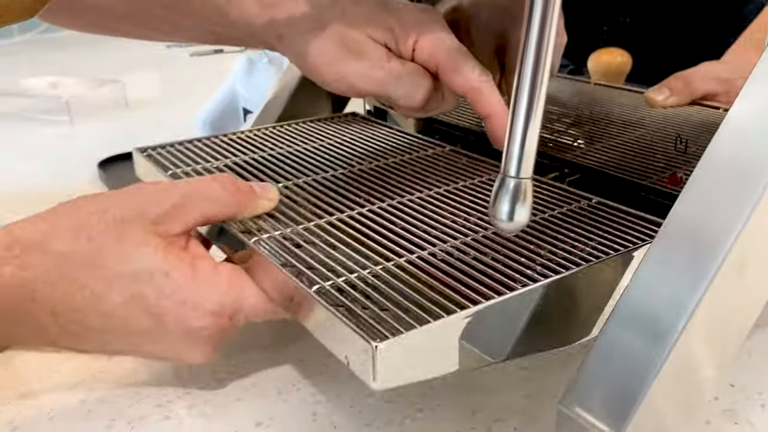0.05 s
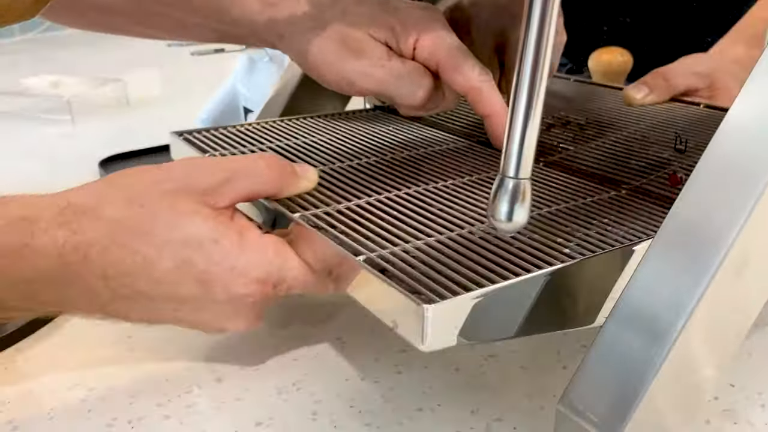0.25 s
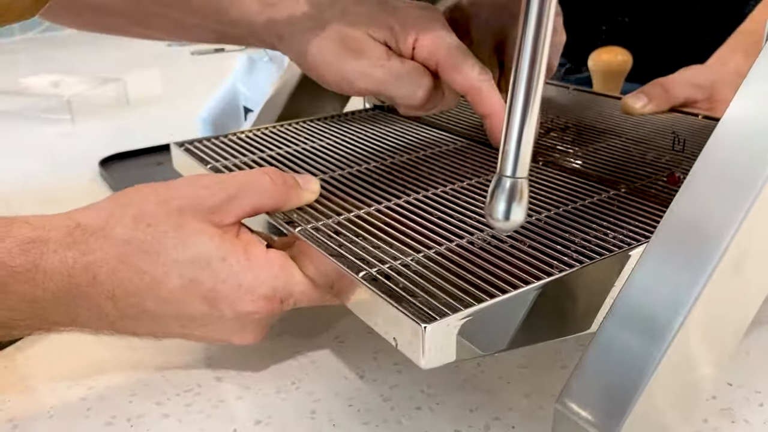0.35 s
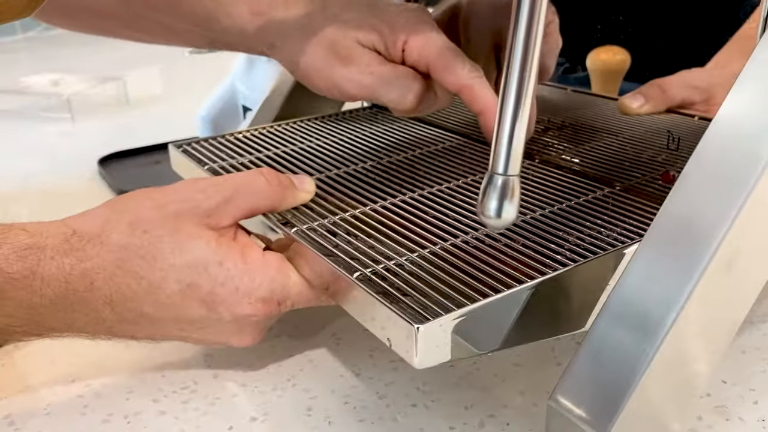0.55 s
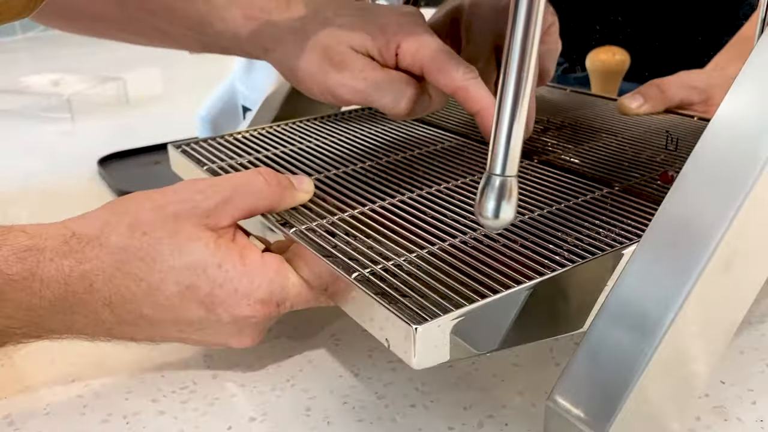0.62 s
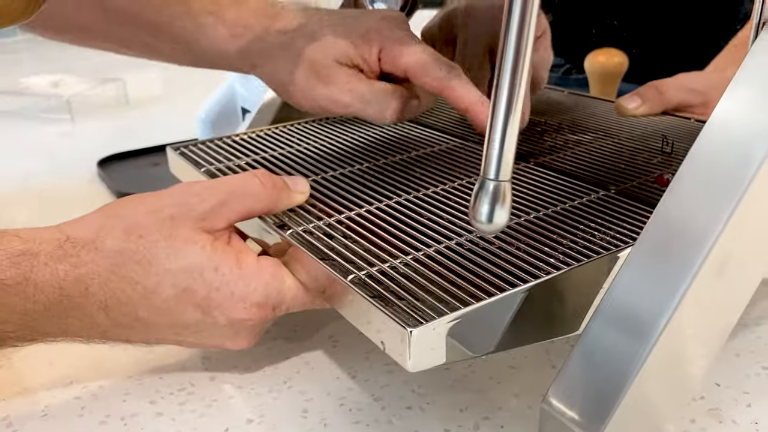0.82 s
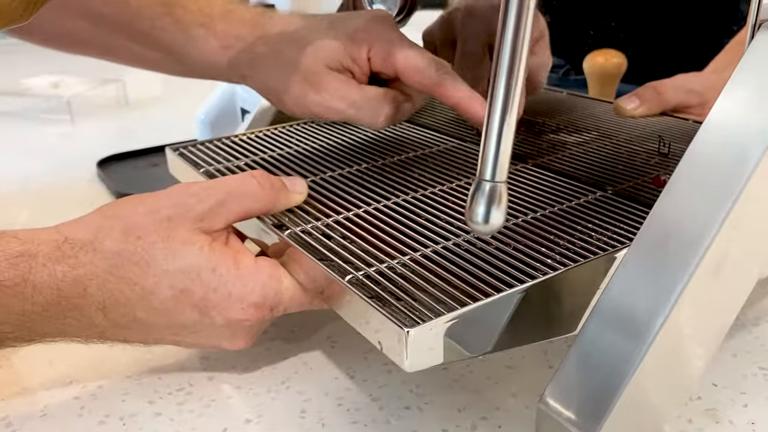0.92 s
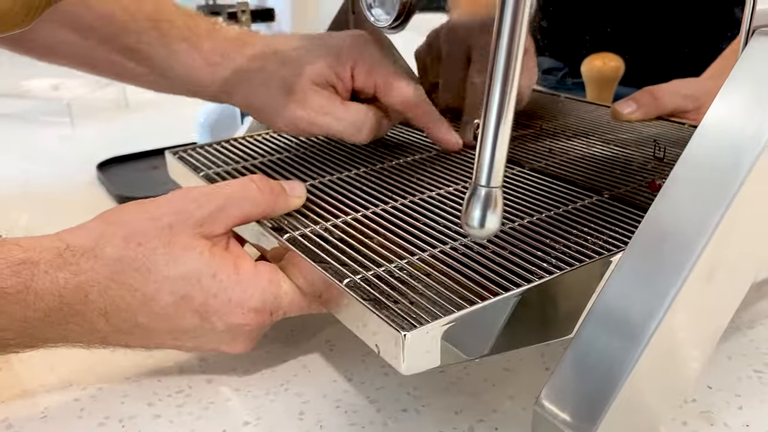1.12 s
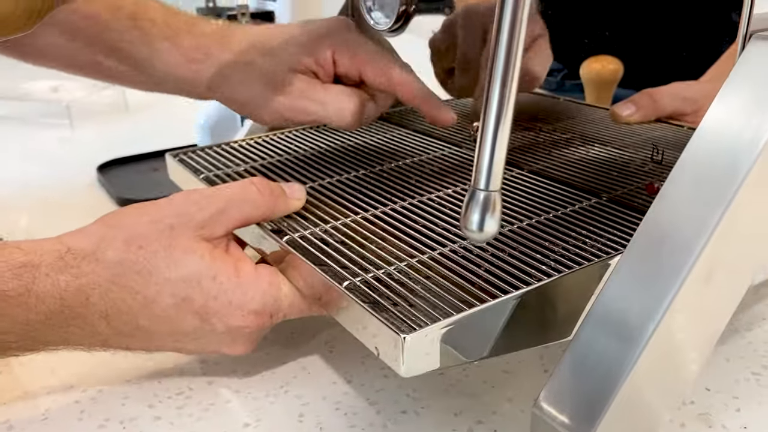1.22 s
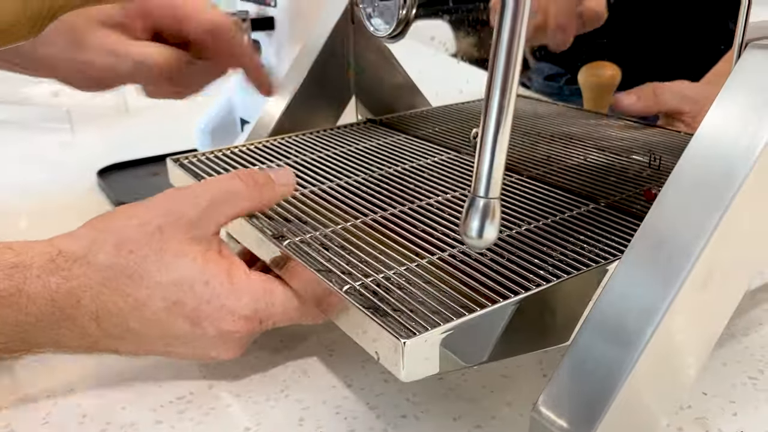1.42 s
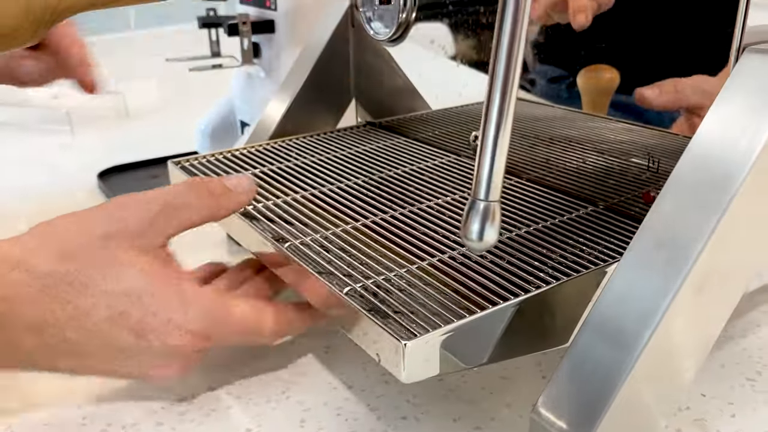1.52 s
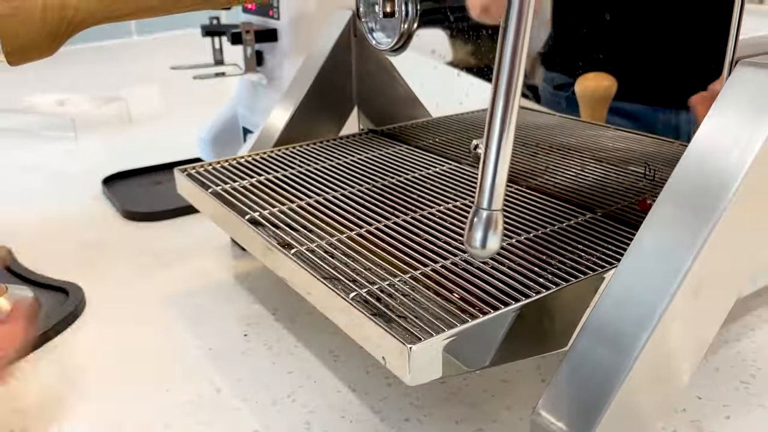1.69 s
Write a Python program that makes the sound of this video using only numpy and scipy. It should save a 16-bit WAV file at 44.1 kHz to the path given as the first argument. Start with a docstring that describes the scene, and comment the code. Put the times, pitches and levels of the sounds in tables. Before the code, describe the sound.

A steel drip tray slides into a coffee machine with a thin, falling squeak and clacks loudly into place. A few small metal clicks follow as hands press it down, close by in a quiet kitchen.

```python
"""A drip tray slides home

A steel drip tray rubs along its rail into a coffee machine with a thin falling squeak, clacks against its stop
and thumps home. Four small metal clicks follow as hands press it down and let go. Each hit is a burst of noise
plus fading tones. A quiet kitchen rings briefly after each contact."""
import sys
import numpy as np
from scipy import signal
from scipy.fft import rfft, irfft
from scipy.io import wavfile

SR = 44100
rng = np.random.default_rng(int(sys.argv[2]) if len(sys.argv) > 2 else 0)


def generate_wav(signal):
    """Clip the signal to [-1, 1] and save it as 16-bit WAV at the path in sys.argv[1]."""
    frames = np.transpose(np.atleast_2d(signal))
    scaled = np.clip(frames, -1, 1) * 32767
    pcm = np.round(scaled).astype(np.int16)
    wavfile.write(sys.argv[1], SR, pcm)


N = 77175
EVENT_SIZE, ECHO_SIZE = 24000, 36000  # lengths in samples

# The kitchen's still air. Each row: frequency in Hz, relative level in dB.
AIR_SPECTRUM = [(25, 3), (52, 10), (85, -6.5), (160, -6.5), (300, -10.5), (550, -12.5), (1200, -18.5),
                (3000, -30.5), (8000, -35.5), (15500, -41)]
# The kitchen's echo. Each row: frequency in Hz, level in dB, fade time in seconds.
# A fade time (t60) is how long a sound takes to drop by 60 dB.
ECHO_BANDS = [(101, -7, 0.72), (256, -6.5, 0.39), (500, -11, .52), (980, -10, 0.82), (2160, -7, 0.61),
              (3986, -13, 0.6), (7840, -13, 0.52), (15000, -14, 0.42)]
# Soft bumps of hands and tray. Each row: start in seconds, level in dB, rise and fade times in
# seconds, centre frequency in Hz.
SOFT_BUMPS = [(0.0, -56, .004, 0.24, 255), (0.065, -50, 0.002, 0.072, 750),
              (0.067, -48.5, 0.0051, 0.29, 235), (0.125, -58, .015, 0.22, 710),
              (0.950, -52, 0.0031, 0.35, 210), (1.087, -39, .002, 0.062, 660),
              (1.087, -49.5, 0.0037, 0.31, 188), (1.226, -57, 0.003, 0.054, 520),
              (1.385, -63, 0.024, 0.24, 500), (1.525, -72, 0.026, 0.28, 2700)]
# The rail's squeak. Each row: time in seconds, pitch in Hz, tone level and scrape level in dB.
SQUEAK_PATH = [(0, 10500, -53, -46.5), (.018, 10950, -52, -48), (0.031, 10910, -45.5, -57.5),
               (.046, 10050, -47.5, -59.5), (.055, 9070, -51, -58.5), (.07, 8770, -55, -64),
               (.085, 8450, -70.5, -65), (.105, 8500, -59.5, -67), (.125, 7400, -68, -62),
               (.146, 6300, -56, -65.5), (0.152, 6010, -49, -64.5), (.165, 6200, -70, -69),
               (.2, 6176, -88.5, -76.5)]
# Scratches along the rail. Each row: start in seconds, level in dB.
RAIL_SCRATCHES = [(.064, -57.5), (.082, -55.5), (.124, -54.5), (.160, -60.5)]
# The hiss of rubbing steel. Each row: frequency in Hz, relative level in dB.
HISS_SPECTRUM = [(2000, -29), (3500, -10.5), (5000, -3), (6800, 2.5), (9000, -8.5), (13500, -4),
                 (16000, -12)]
# Small clicks. Each row: start in seconds, snap level in dB, snap fade time in seconds,
# treble tilt in dB per octave, wire ring level and tray ring level in dB.
GRID_CLICKS = [(0.9476, -26, 0.03, -2.5, -28, -46.5), (0.9584, -39, 0.044, -3.5, -28, -46),
               (0.9936, -26, 0.04, 3, -39.5, -52.5), (1.0820, -33, 0.065, 5, -46, -51.5)]
# The snap of a click. Each row: frequency in Hz, relative level in dB.
SNAP_SPECTRUM = [(110, -38), (200, -5.5), (600, 2), (1500, 1), (2800, -3), (4500, -3), (8000, -6),
                 (12500, -7), (15500, -20)]
# The ringing tones of the grid wires, the tray and the machine's frame.
# Each row: pitch in Hz, relative level in dB, fade time in seconds.
WIRE_TONES = [(1465, -8.5, 0.054), (2355, -17, 0.043), (4074, -9, 0.058), (4420, -10, .05),
              (5170, -20, 0.052), (6330, -5.5, 0.032), (6420, -0.5, 0.04), (6710, -17, .05)]
TRAY_TONES = [(198, -7, .3), (278, -6, .28), (468, -5, .22), (500, 1, .33), (533, -6, .24), (597, -4, .3),
              (714, -9, .32), (850, -15, .3), (1014, -10, .3), (1166, -13, .3), (1397, -13, .2),
              (2557, -14, .12), (3222, -7, .12), (3501, -11, .12)]
FRAME_TONES = [(85.4, -13.5, 0.22), (105.2, -12, 0.14), (158.6, -12, 0.41), (210, -4.5, 0.11),
               (276, 5, 0.086)]
# The tray hits its stop. Each row: start in seconds, then crack, boom and tray ring levels in dB.
STOP_HITS = [(0.2132, -38, -41.5, -55), (0.2263, -37.5, -39, -56), (0.2378, -15.5, -17.5, -39.5),
             (0.2466, -10.5, -15.5, -38.5), (0.2528, -15, -5, -26), (0.2578, -14, -25.5, -43)]
# The crack of one such hit. Each row: frequency in Hz, relative level in dB.
CRACK_SPECTRUM = [(60, -22.5), (300, -0.5), (950, 4.5), (2200, -4), (3500, 0), (6500, -3), (10500, -9.5),
                  (15500, -18)]

CONTACT_S = 0.0009  # rise time of a hard hit


def amp(db):
    """Turn decibels into a number to multiply a sound by."""
    return 10 ** (np.asarray(db) / 20)


def octaves(size):
    """The frequencies in a sound of this many samples, as octaves above 1 Hz."""
    return np.log2(np.maximum(np.arange(size // 2 + 1) * SR / size, 1))


def noise(spectrum, tilt_db=0, size=EVENT_SIZE):
    """Noise of strength 1, shaped by a spectrum and tilted by tilt_db per octave."""
    hz, db = np.array(spectrum).T
    octave = octaves(size)
    gain = amp(np.interp(octave, np.log2(hz), db) + tilt_db * octave)
    x = irfft(rfft(rng.standard_normal(size)) * gain, size)
    return x / x.std()


def wander(hz):
    """A random wobble of strength 1, mostly slower than hz."""
    smoothing = signal.butter(2, min(hz, SR / 4), fs=SR, output="sos")
    x = signal.sosfilt(smoothing, rng.standard_normal(EVENT_SIZE))
    return x / x.std()


def strike(t60, rise, size=EVENT_SIZE):
    """The loudness of a hit: a straight rise, then a fade. Both times are in seconds."""
    t = np.arange(size) / SR
    return np.minimum(t / rise, 1) * np.exp(-np.log(1000) * np.maximum(t - rise, 0) / t60)


def ring(tones, rise):
    """One blow starts several pure tones, each fading at its own speed."""
    t = np.arange(EVENT_SIZE) / SR
    return sum(amp(db) * strike(t60, rise) * np.sin(2 * np.pi * hz * t) for hz, db, t60 in tones)


def place(events):
    """Mix (start in seconds, sound) pairs into one track."""
    out = np.zeros(N)
    for start, x in events:
        i = max(int(start * SR), 0)
        out[i:i + len(x)] += x[:N - i]
    return out


def still_air():
    """The quiet room makes a faint, low rush."""
    return amp(-57) * noise(AIR_SPECTRUM, size=N)


def kitchen_echo(sound):
    """Sound bounces off the counter and machine first, then lingers in the room."""
    unit_energy = lambda shape: shape / np.linalg.norm(shape)
    hz, levels, fades = np.array(ECHO_BANDS).T
    white = rfft(rng.standard_normal(ECHO_SIZE))
    early = amp(-9.5) * rng.standard_normal(EVENT_SIZE) * unit_energy(strike(t60=0.049, rise=CONTACT_S))
    tail = np.zeros(ECHO_SIZE)
    for share, db, t60 in zip(np.eye(len(hz)), levels, fades):
        band = irfft(white * np.interp(octaves(ECHO_SIZE), np.log2(hz), share))
        tail += amp(db) * band * unit_energy(strike(t60, rise=0.008, size=ECHO_SIZE))
    echoes = place([(0.0015, early), (0.005, tail)])[:ECHO_SIZE]
    return signal.fftconvolve(sound, echoes)[:N]


def hand_bumps():
    """Hands and tray bump and brush softly: puffs of noise, each strongest at one frequency."""
    near_db, far_db = -17.5, -42  # one octave and three octaves from the centre
    hump = lambda hz: [(hz / 8, far_db), (hz / 2, near_db), (hz, 0),
                       (hz * 2, near_db), (hz * 8, far_db), (hz * 64, 2 * far_db)]
    return place((start, amp(db) * strike(t60, rise) * noise(hump(hz)))
                 for start, db, rise, t60, hz in SOFT_BUMPS)


def rail_squeak():
    """Steel rubs on the rail: the squeak falls as the tray slows and breaks into grainy scratches."""
    pitch_jitter, flutter_db, grain_db, scrape_width_hz = 0.006, 1, 2.5, 800
    t = np.arange(EVENT_SIZE) / SR
    times, *columns = np.array(SQUEAK_PATH).T
    hz, tone_db, scrape_db = (np.interp(t, times, column) for column in columns)
    phase = 2 * np.pi * np.cumsum(hz * (1 + pitch_jitter * wander(hz=400))) / SR
    tone = np.sqrt(2) * np.sin(phase) * amp(flutter_db * wander(hz=150))
    # The scrape is a band of noise that follows the pitch, plus a little hiss.
    scrape = wander(scrape_width_hz) * np.sin(phase) + wander(scrape_width_hz) * np.cos(phase)
    scrape += amp(-18) * noise(HISS_SPECTRUM)
    grain = lambda: amp(grain_db * wander(hz=400))
    squeak = (amp(tone_db) * tone + amp(scrape_db) * scrape * grain()) * (t < times[-1])
    fade = strike(t60=0.17, rise=0.011)
    scratches = [(start, amp(db) * fade * noise(HISS_SPECTRUM) * grain()) for start, db in RAIL_SCRATCHES]
    return place([(0, squeak)] + scratches)


def grid_clicks():
    """The wire grid settles in the tray with short snaps."""
    return place((start, amp(db) * strike(t60, rise=0.0014) * noise(SNAP_SPECTRUM, tilt_db))
                 for start, db, t60, tilt_db, _, _ in GRID_CLICKS)


def metal_ringing():
    """Hits and clicks ring the tray, clicks ping the wires, and the last hit thumps the frame."""
    tray, wires = ring(TRAY_TONES, CONTACT_S), ring(WIRE_TONES, CONTACT_S)
    hits = [(start, amp(db) * tray) for start, _, _, db in STOP_HITS]
    pings = [(start, amp(wire_db) * wires + amp(tray_db) * tray)
             for start, _, _, _, wire_db, tray_db in GRID_CLICKS]
    thump = amp(-20.5) * ring(FRAME_TONES, rise=0.0017)
    return place(hits + pings + [(0.2575, thump)])


def tray_clack():
    """The tray rattles against its stop: each hit makes a sharp crack and a boom in the pan."""
    boom_hz, boom_fade_s = 492, 0.055
    boom = ring([(boom_hz, 0, boom_fade_s)], CONTACT_S)
    crack_fade = strike(t60=0.038, rise=0.001)
    return place((start, amp(crack_db) * crack_fade * noise(CRACK_SPECTRUM) + amp(boom_db) * boom)
                 for start, crack_db, boom_db, _ in STOP_HITS)


def scene():
    """Add up the tray, its echo and the still air of the kitchen."""
    contacts = rail_squeak() + tray_clack() + grid_clicks() + hand_bumps()
    metal = metal_ringing()
    # The ringing of tray, wires and frame is heard mostly direct, with a little less echo.
    echo = kitchen_echo(contacts + amp(-3) * metal)
    return (contacts + metal + echo + still_air())[None]


def record(dry):
    """The microphone thins the deep bass and rounds the loudest peak; the recorder cuts the top treble."""
    low_hz, top_hz, peak_limit = 75, 15850, 0.58
    x = signal.sosfilt(signal.butter(3, low_hz, "high", fs=SR, output="sos"), dry)
    x = peak_limit * np.tanh(x / peak_limit)
    return signal.sosfilt(signal.ellip(8, .2, 70, top_hz, fs=SR, output="sos"), x)


dry = scene()
out = record(dry)
generate_wav(out)
```